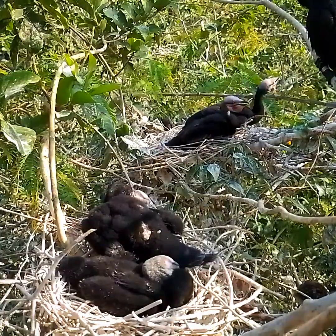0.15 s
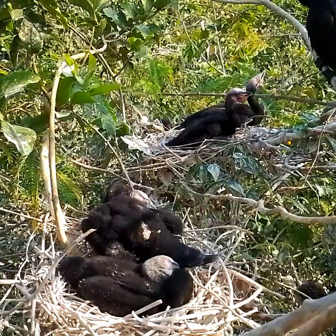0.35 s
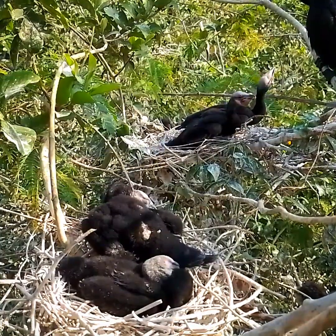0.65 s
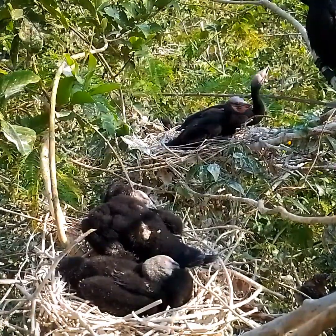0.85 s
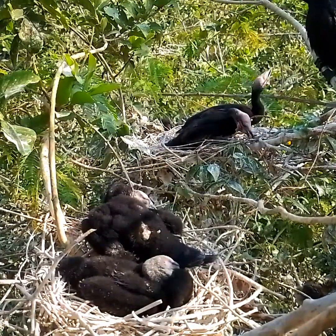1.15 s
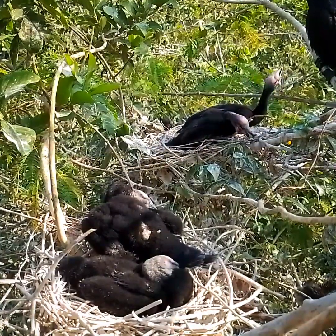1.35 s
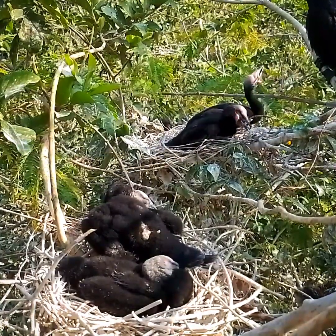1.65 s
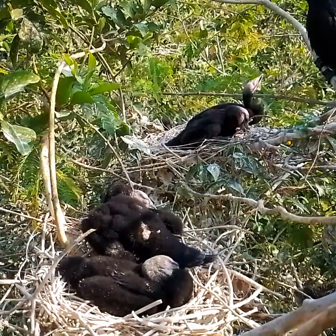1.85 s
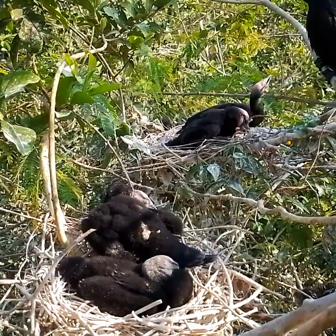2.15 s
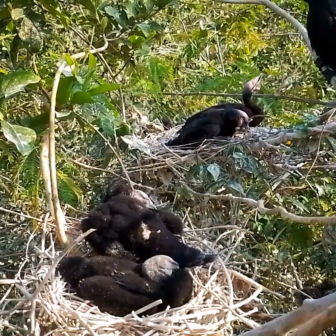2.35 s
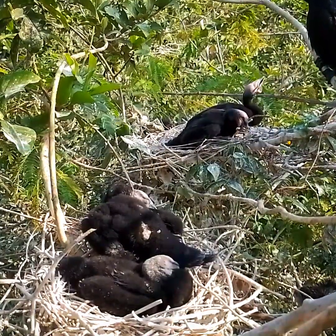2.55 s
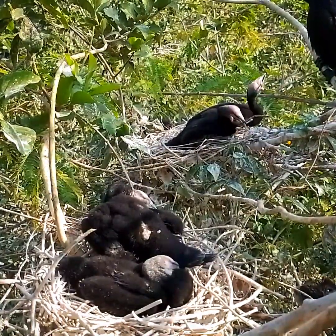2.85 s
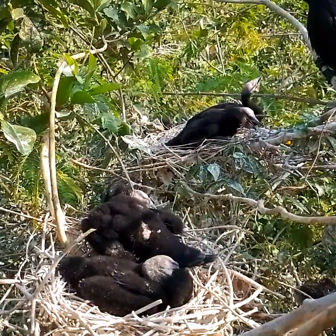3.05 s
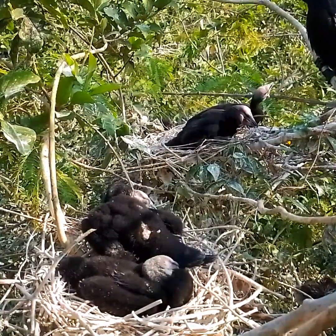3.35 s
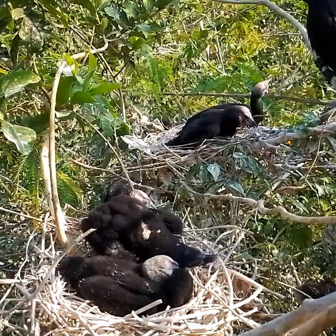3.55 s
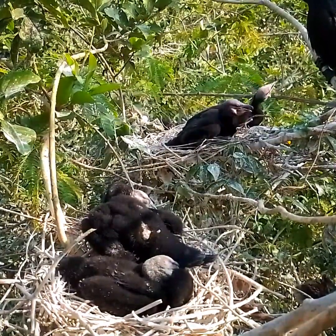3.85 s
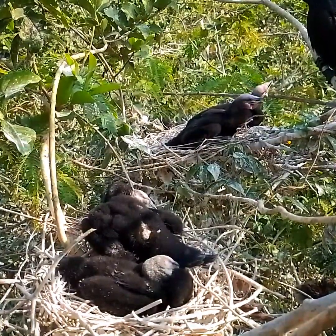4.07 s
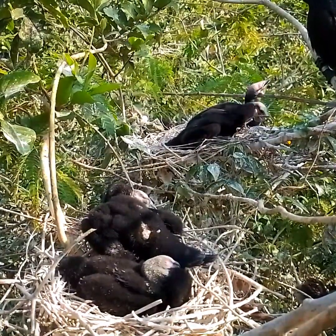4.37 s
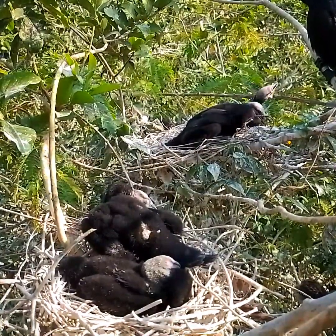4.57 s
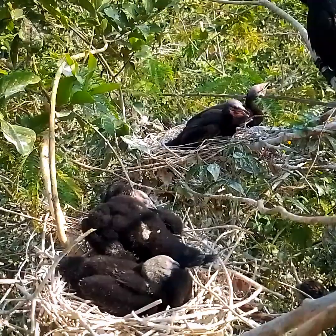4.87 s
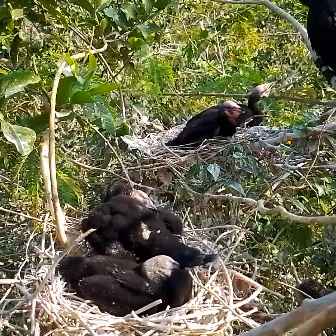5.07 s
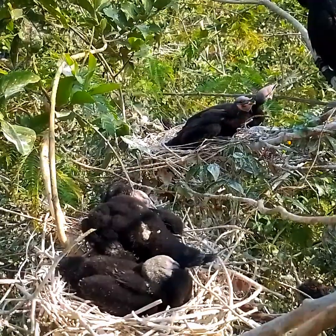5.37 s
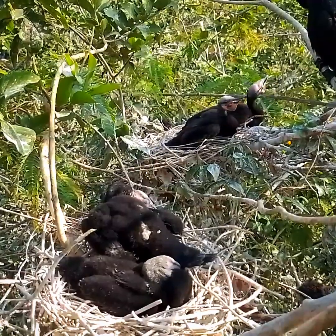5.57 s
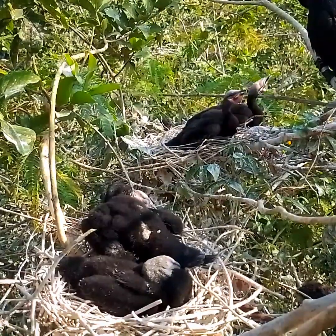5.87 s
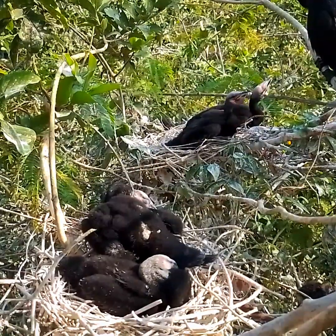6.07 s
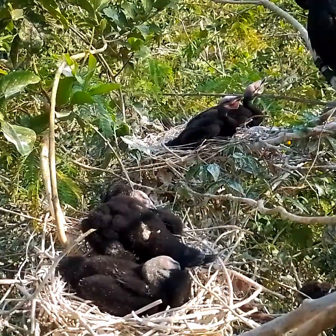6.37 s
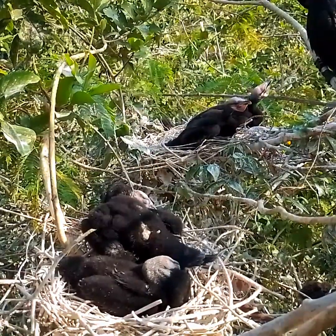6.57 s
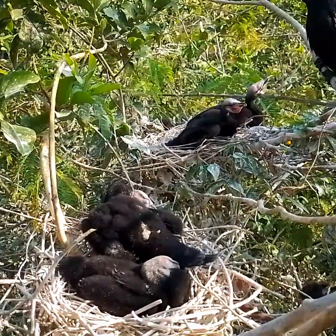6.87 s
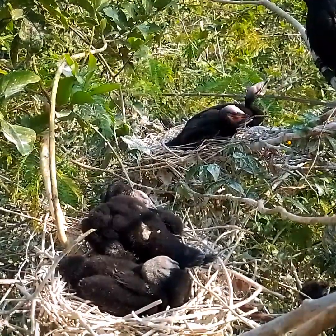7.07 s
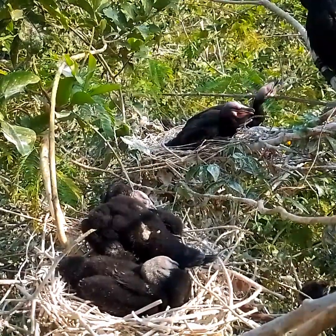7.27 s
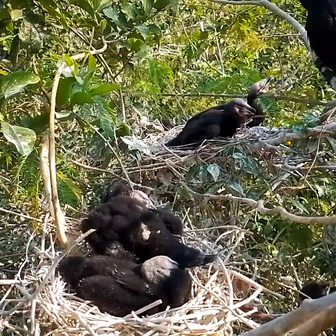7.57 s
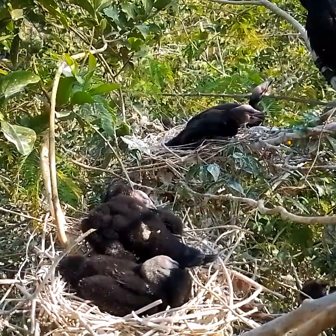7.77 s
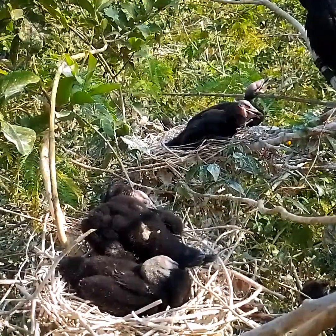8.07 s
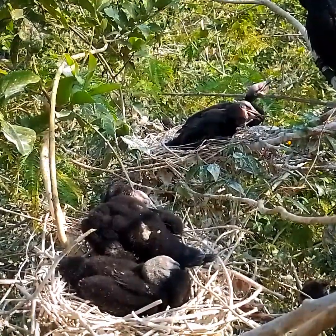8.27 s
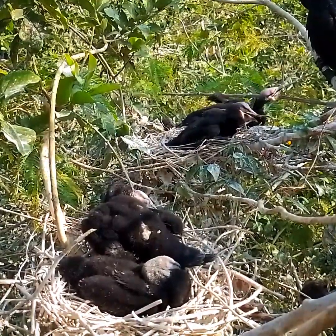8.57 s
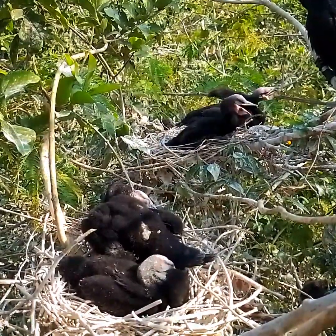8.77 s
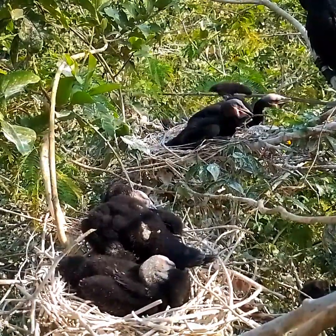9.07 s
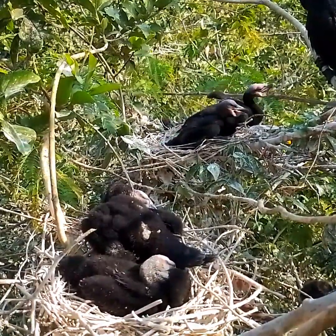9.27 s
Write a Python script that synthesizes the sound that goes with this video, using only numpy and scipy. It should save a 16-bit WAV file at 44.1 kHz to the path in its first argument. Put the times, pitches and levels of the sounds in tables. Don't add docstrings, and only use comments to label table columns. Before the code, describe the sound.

Outdoors in a leafy nesting colony, several dark waterbird chicks beg without pause. Short buzzing chirps repeat about five times a second on the left and are answered by breathier ones on the right, over hoarse chatter. Squeals and rasps grow harsher after six seconds, with soft adult coos almost buried beneath. A nearby stereo microphone catches quick twig and foliage echoes, faint wind and the hiss of distant birds.

```python
import sys
import numpy as np
from scipy import signal
from scipy.fft import rfft, irfft
from scipy.io import wavfile
from scipy.ndimage import uniform_filter1d, map_coordinates

SR = 44100
rng = np.random.default_rng(int(sys.argv[2]) if len(sys.argv) > 2 else 0)


def transcribe(signal):
    frames = np.atleast_2d(signal).T
    limited = np.clip(frames, -1, 1)
    pcm = np.round(limited * 32767).astype(np.int16)
    wavfile.write(sys.argv[1], SR, pcm)


def how_loud(loudness_db):
    steps = np.asarray(loudness_db, float) / 20
    return 10 ** steps


N = 415422

# hz, gain_db
LEFT_PORT = [(150, -55), (700, -25.5), (1300, -19), (2000, -11), (2800, -5.5), (5000, -0.5), (6200, -5),
             (7500, 12.5), (8100, 2.5), (8800, -23), (10500, -19.5), (14200, -27.5), (15000, -74)]
RIGHT_PORT = [(150, -71), (700, -23.5), (1300, -32), (2000, -12.5), (2800, -8), (5000, -4.5), (6200, -14.5),
              (8500, -9.5), (9600, -12), (10500, 3), (11500, -12.5), (14200, -24), (15000, -78)]
PORT_DELAY_S = 14.5 / 44100

# hz, level_db_per_hz
AIR_COLOUR = [(15, -22), (25, -5), (94, -5.5), (156, -18), (230, -5), (496, -2), (630, -1), (1090, -3.5),
              (1580, -2.5), (2000, -4.5), (2600, -14.5), (4400, -120)]
# hz, level_db_per_hz
FAR_COLOUR = [(2000, -30), (3000, -12), (5000, -12.5), (7500, -0.5), (9000, -7), (10500, -6.5),
              (13000, -14), (14100, -20), (14500, -70)]
# hz, t60_s
CROWN_DECAY = [(500, 0.14), (3000, 0.1), (10000, 0.1)]

# top_s, top_pitch_hz, level_db, rise_s
ADULT_COOS = [
    (5.643, 373, -65, 0.047),
    (6.25, 464, -57, 0.039),
    (6.63, 653, -50, 0.036),
    (7.081, 606, -53, 0.055),
    (7.71, 536, -63, 0.034),
    (8.111, 614, -55.5, 0.035),
    (8.474, 638, -54, 0.049),
    (9.117, 436, -60, 0.047),
]
# start_s, length_s, from_hz, to_hz, level_db
CLEAN_PIPS = [
    (2.285, .04, 1500, 1480, -44),
    (2.3, .045, 1150, 1120, -42),
    (7.89, .036, 3500, 1750, -36),
    (7.495, .035, 380, 200, -65),
    (2.575, .035, 340, 320, -67),
    (2.29, .07, 420, 380, -65),
    (6.72, .065, 450, 740, -58),
    (7.89, .028, 7200, 5200, -44),
    (2.285, .06, 1320, 1290, -49),
    (0, .02, 650, 720, -57),
]

# start_s, length_s, from_hz, to_hz, level_db
MELLOW_SQUEALS = [(2.319, 0.087, 2970, 2460, -36.5), (4.371, 0.13, 2960, 2795, -37.5),
                  (4.899, .17, 2636, 2440, -43), (5.091, 0.37, 3090, 3190, -53),
                  (6.101, 0.4, 1693, 1740, -53), (6.762, 0.44, 1347, 1351, -48),
                  (8.35, 0.038, 3900, 3890, -46), (8.43, .15, 2910, 2970, -54.5),
                  (8.6, 0.1, 2940, 2750, -50.5), (8.72, 0.11, 2656, 2510, -50),
                  (8.86, .14, 2460, 2296, -49), (9, .04, 2400, 3600, -50.5)]
SHRILL_SQUEALS = [(6.1, .2, 3000, 2950, -51), (6.16, .07, 3800, 3800, -59.5), (7.2, .06, 2300, 2700, -55.5),
                  (7.26, .08, 3600, 2900, -56.5), (6.64, .16, 2950, 3500, -52),
                  (4.33, 0.18, 3050, 2900, -53), (4.9, .15, 3050, 2950, -59.5),
                  (7.74, 0.1, 2550, 2600, -56), (7.8, 0.12, 3550, 3150, -53.5),
                  (8.78, 0.17, 2520, 2200, -58.5), (9.27, 0.15, 2600, 2420, -51.5),
                  (2.46, 0.048, 2950, 2950, -61)]
# start_s, length_s, from_hz, to_hz, level_db
THIN_WHISTLES = [(0.846, .1, 10900, 11000, -49), (1.456, .2, 10840, 10550, -49.5),
                 (1.731, 0.2, 10500, 10860, -48.5), (2.878, .27, 10600, 10700, -50.5),
                 (4.9, .17, 11000, 10800, -50), (4.96, 0.13, 10230, 10000, -52),
                 (6.59, 0.102, 10600, 10370, -48), (7.13, 0.23, 10400, 10100, -49.5),
                 (7.727, .17, 10970, 10440, -44.5), (7.814, 0.1, 10200, 9740, -36),
                 (8.299, .1, 10400, 10700, -46), (8.82, .12, 10600, 10300, -49)]

# top_s, level_db,
# swell_s, fade_s, throat_hz
CHATTER = [(0.039, -31, 0.068, 0.084, 3260), (.241, -37.5, 0.05, 0.31, 2760),
           (.47, -32.5, 0.066, 0.045, 2860), (0.873, -35.5, 0.14, 0.11, 4200),
           (1.07, -35, 0.024, 0.2, 4130), (1.23, -39.5, 0.011, 1, 3320),
           (1.73, -36, 0.0099, 0.21, 4700), (2.408, -30.5, 0.28, 0.047, 2920),
           (2.92, -39.5, 0.3, 0.51, 3130), (2.66, -40, 0.22, 0.06, 3900),
           (2.73, -39, 0.021, 0.027, 3900), (2.79, -39, 0.024, 0.046, 3150),
           (3.6, -42, 0.37, 0.54, 2950), (3.831, -33.5, 0.11, 0.025, 3050),
           (4.1, -42, 0.38, 0.36, 3000), (4.86, -39, 0.13, 0.07, 2850), (5.3, -45, 1, 0.8, 3200),
           (5.55, -40.5, 0.027, 0.46, 3010)]
HELD_RASPS = [(4.39, -36.5, 0.18, 0.19, 3060), (4.98, -34.5, 0.084, 0.15, 2790),
              (6.12, -39, 0.029, 0.049, 2960), (6.2, -39, 0.079, 0.13, 2900),
              (6.38, -44.5, 0.04, 0.057, 3530), (6.56, -53, 0.051, .06, 2900),
              (6.68, -29, 0.15, 0.067, 2830), (6.79, -30.5, 0.13, 0.072, 3030),
              (7.01, -41, 0.074, 0.066, 3160), (7.16, -29.5, 0.062, 0.17, 2800),
              (7.29, -31, 0.088, 0.086, 3070), (7.6, -41, 0.63, 0.33, 3280),
              (7.85, -27.5, 0.15, 0.081, 3150), (8.08, -43, 0.35, 0.14, 3020),
              (8.33, -32.5, 0.19, 0.18, 3310), (8.7, -41.5, 0.16, 0.12, 2620),
              (8.87, -35, 0.28, 0.13, 2420), (9.15, -38, 0.1, 0.15, 2970), (9.4, -33.5, 0.11, 0.091, 2540)]
# time_s, opening_db, hiss_db
FLOCK_BEAKS = [(0, 3.5, 4), (1, 4, -2), (2, 0.5, 1), (2.45, 1.5, 2), (2.75, 1, 6), (3, -1.5, 10),
               (3.4, 4.5, -4), (3.82, 1.5, -7), (4.2, 4, -2), (4.6, 3, -2), (5, 6.5, 4), (5.6, -0.5, 10),
               (6.25, 4.5, 6.5), (7, 3.5, 9.5), (7.85, 5.5, 11), (8.35, 11.5, 1), (8.7, 9, 2), (9.42, 2, 7)]

# pitch_hz, throat_hz
LEFT_NESTLINGS = [
    (688.5, 3008),
    (602, 3090),
    (838, 3004),
    (924, 4400),
    (653, 4260),
]
RIGHT_NESTLINGS = [
    (958, 3040),
    (920, 4190),
    (694.5, 2970),
    (706, 4620),
]
# start_s, length_s, level_db, beak_opening_db
LEFT_BIRD_1 = [(0, 0.012, -29, 5), (0.19, 0.02, -27.5, 2), (0.388, 0.032, -25.5, 4),
               (0.599, 0.028, -27, 0.5), (0.802, 0.021, -24.5, 6), (1.004, 0.028, -26, 2.5),
               (1.216, 0.029, -25.5, 4.5), (2.07, 0.028, -21.5, 3.5), (2.767, 0.016, -42.5, 11),
               (3.558, 0.023, -28, 9), (3.768, 0.025, -28, 6), (3.992, 0.025, -29.5, 4.5),
               (4.23, 0.022, -25.5, 8), (5.064, .015, -38, 15), (6.344, 0.06, -45, 11.5),
               (6.489, 0.018, -48.5, 10), (7.943, 0.021, -42.5, -10), (8.827, 0.012, -33.5, 19),
               (9.227, 0.017, -35.5, -1), (9.272, 0.018, -46, 13), (9.35, 0.019, -32.5, 13.5)]
LEFT_BIRD_2 = [(.504, 0.02, -36, 9.8), (.57, 0.029, -43.5, 1), (.745, 0.04, -40, 4),
               (0.847, 0.019, -35.5, 21), (1.845, 0.023, -35, 11), (1.866, 0.044, -26.5, 6),
               (2.9, 0.014, -39, 9.7), (3.33, 0.023, -33.5, 5.6), (3.528, 0.0071, -38.5, 27),
               (3.718, .019, -34.5, 14.5), (4.328, 0.041, -32.5, 14.5), (5.705, 0.02, -38, 1),
               (5.861, 0.04, -42, 6), (6.98, 0.054, -40, 5.7), (7.998, 0.034, -31.5, 10.8),
               (8.195, 0.027, -33, 19)]
LEFT_BIRD_3 = [
    (.931, 0.029, -40, -0.5),
    (2.59, 0.014, -45, 6),
    (3.035, 0.024, -34, 7.5),
    (4.131, 0.027, -34, 6.5),
    (4.302, 0.025, -31, 15.5),
    (4.519, 0.03, -33, 12.5),
    (5.8, 0.025, -34, 29),
    (8.416, 0.029, -33, 22),
    (8.982, 0.051, -38.5, 11.5),
]
LEFT_BIRD_4 = [
    (.021, .022, -25.5, 30),
    (1.423, 0.057, -41.5, 2.5),
    (1.577, 0.04, -36.5, 7.4),
    (1.975, 0.018, -29.5, 18),
    (3.213, 0.027, -41.5, 8.8),
    (3.595, 0.026, -34, 8.4),
    (5.553, 0.014, -29, 22),
]
LEFT_BIRD_5 = [
    (1.645, 0.043, -36.5, 14),
    (2.027, 0.035, -34.5, 10.5),
    (2.211, 0.037, -30.5, 11.5),
    (2.269, 0.029, -22.5, 0),
    (9.156, 0.037, -37.5, 10),
]
RIGHT_BIRD_1 = [(.241, 0.025, -28, 17.3), (0.658, 0.051, -30.5, 17.7), (1.314, 0.013, -30, 17),
                (1.529, 0.039, -34, 26), (2.397, 0.0085, -26, 19), (2.952, 0.036, -40, 5.7),
                (3.118, 0.04, -35, 10.4), (4.091, 0.036, -32.5, 21), (5.115, 0.026, -27, 17.5),
                (7.383, 0.028, -30, 17), (8.68, .02, -39, 12), (8.698, 0.028, -31, 19)]
RIGHT_BIRD_2 = [(0.454, 0.019, -27, 26), (1.716, 0.039, -39, 19), (1.76, 0.02, -31, 29),
                (2.183, 0.021, -29.5, 22), (2.616, 0.013, -32, 17.6), (3.253, 0.081, -37.5, 14),
                (3.476, 0.0096, -30, 19.5), (3.682, 0.021, -34.5, 22), (3.888, 0.019, -36.5, 26),
                (4.682, 0.019, -35, 20), (4.889, 0.05, -32, 27), (8.164, 0.013, -39, 15),
                (8.337, 0.064, -36, 75)]
RIGHT_BIRD_3 = [(1.095, 0.023, -32.5, 15.5), (3.069, 0.022, -34, 13), (4.026, 0.034, -34, 10.5),
                (4.627, 0.03, -42.5, 7), (4.724, .022, -37, 14), (5.342, 0.05, -31.5, 16),
                (6.027, 0.02, -41.5, 15.5), (5.275, 0.0097, -46.5, 6), (5.447, 0.007, -47, 16),
                (5.676, 0.015, -29, 22), (6.513, 0.019, -36, 15.5), (6.857, 0.027, -33.5, 13),
                (6.931, 0.02, -39.5, -4.5), (7.502, 0.022, -34.5, 6.5), (7.615, 0.035, -36.5, 10),
                (8.099, 0.039, -39, 10), (8.594, 0.06, -37.5, 12), (9.126, 0.021, -36.5, 15)]
RIGHT_BIRD_4 = [
    (3.394, 0.058, -35.5, 7.9),
    (6.543, 0.018, -36.5, 8.7),
    (8.875, 0.05, -37, 360),
]


def unit(x):
    return x / np.sqrt(np.mean(np.abs(x) ** 2) + 1e-20)


def along(points, hz):
    f, v = np.transpose(points)
    return np.interp(np.log(hz + 1), np.log(f + 1), v)


def ports(hz, side, shade_db):
    cepstrum = irfft(np.log(how_loud([along(LEFT_PORT, hz), along(RIGHT_PORT, hz)])))
    cepstrum[:, 1:len(hz) - 1] *= 2
    cepstrum[:, len(hz):] = 0
    way = np.array([[side], [-side]]) / 2
    delay = 2j * np.pi * hz * PORT_DELAY_S * (1 + way)
    return np.exp(rfft(cepstrum) - delay) * how_loud(-way * shade_db)


def air():
    z = signal.stft(rng.standard_normal((2, N)), nperseg=1024)[2]
    patches = uniform_filter1d(rng.standard_normal(z.shape[1:]), size=4, axis=0)
    patches = uniform_filter1d(patches, size=6, axis=1)
    patch_db = 3.5 * unit(patches) * (np.arange(513) > 6)[:, None]
    common, own = rfft(signal.istft(z * how_loud(patch_db), nperseg=1024)[1][:, :N])
    hz = np.fft.rfftfreq(N, 1 / SR)
    apart = np.where(hz < 125, .8, .42)
    pair = np.array([common + apart * own, common - apart * own])
    return unit(irfft(pair * how_loud(along(AIR_COLOUR, hz)), N))


def far_colony(din_db):
    colour = how_loud(along(FAR_COLOUR, np.fft.rfftfreq(N, 1 / SR)))
    hiss = unit(irfft(rfft(rng.standard_normal((2, N))) * colour, N))
    return hiss * how_loud(-62 + .4 * (din_db + 40))


def foliage(x):
    out, hop = np.zeros((2, N + SR)), SR // 4
    fade = np.hanning(2 * hop)
    for i in range(-hop, N, hop):
        start = max(i, 0)
        hz, t, z = signal.stft(rng.standard_normal((2, SR // 3)), SR, nperseg=256)
        decay_db = -60 * t / along(CROWN_DECAY, hz)[:, None]
        tail = signal.istft(z * how_loud(decay_db), SR, nperseg=256)[1]
        piece = x[:, start:i + 2 * hop]
        piece = piece * fade[max(-i, 0):][:piece.shape[1]]
        wet = signal.fftconvolve(piece, tail / np.linalg.norm(tail[0]), axes=1)
        out[:, start + 90:][:, :wet.shape[1]] += wet
    return out[:, :N]


def twigs(hz, echo):
    delay_s, size = rng.uniform(0.00015, .004, (4, 2, 1)), rng.normal(0, echo, (4, 2, 1))
    return 1 + np.sum(size * np.exp(-2j * np.pi * hz * delay_s), axis=0)


def coos():
    out = np.zeros(N)
    for top_s, top_hz, db, rise_s in ADULT_COOS:
        u = np.r_[np.linspace(-1, 0, int(rise_s * SR)), np.linspace(0, 1, int(.038 * SR))]
        phase = 2 * np.pi * np.cumsum(top_hz * (1 - 0.5 * np.abs(u) ** 1.2)) / SR
        overtones = sum(np.sin(k * phase) * rng.uniform(.4, 1.1) for k in range(2, 6))
        tone = np.sin(phase) + how_loud(-3) * overtones
        flutter_db = 2 * unit(uniform_filter1d(rng.standard_normal(len(u)), size=400))
        out[int((top_s - rise_s) * SR):][:len(u)] += how_loud(db + 2 + flutter_db) * (1 - u ** 2) * tone
    return signal.sosfilt(signal.butter(4, 260, 'high', fs=SR, output='sos'), out)


def pips():
    out = np.zeros(N)
    for s, length, from_hz, to_hz, db in CLEAN_PIPS:
        n = int(length * SR)
        waver = unit(uniform_filter1d(rng.standard_normal(n), size=150))
        pitch_hz = np.linspace(from_hz, to_hz, n) * (1 + .025 * waver)
        tone = np.sin(2 * np.pi * np.cumsum(pitch_hz) / SR)
        out[int(s * SR):][:n] += how_loud(db + 5) * np.hanning(n) ** .6 * tone
    return out


def squeals():
    out, m = np.zeros((2, N + 32768)), 32768
    hz = np.fft.rfftfreq(m, 1 / SR)
    heard = ports(hz, 0.99, 5.0)
    table = [(*row, -10.5) for row in MELLOW_SQUEALS + THIN_WHISTLES]
    table += [(*row, 14) for row in SHRILL_SQUEALS]
    for s, length, from_hz, to_hz, db, second_db in table:
        u = np.linspace(0, 1, int(length * 1.1 * SR))
        waver, throb, swell = (unit(uniform_filter1d(rng.standard_normal(len(u)), size=k))
                               for k in (90, 60, 1200))
        pitch_hz = from_hz + (to_hz - from_hz) * u ** 2 + (55 + .009 * from_hz) * waver
        phase = 2 * np.pi * np.cumsum(pitch_hz) / SR
        tone = np.sin(phase) + how_loud(second_db) * np.sin(2 * phase)
        tone += how_loud(second_db - 15) * np.sin(3 * phase)
        tone *= (1 + 0.48 * throb) * how_loud(db + 2.95 * swell)
        tone *= np.minimum(4 * u, 1) * (1 - u ** 8)
        call = irfft(rfft(tone, m) * heard * how_loud(9) * twigs(hz, echo=.15))
        out[:, int((s - .05 * length) * SR):][:, :m] += call
    return out[:, :N]


def bump(hz, centre_hz, width_hz, db):
    return how_loud(db) * 1j * hz * width_hz / (centre_hz ** 2 - hz ** 2 + 1j * hz * width_hz)


def beak(hz, open_db):
    return how_loud(open_db / (1 + (5200 / (hz + 1)) ** 8))


def top_shelf(hz, db):
    return how_loud(db / (1 + (11800 / (hz + 1)) ** 12))


def buzz(pitch_hz, jitter, scatter_db, noisy):
    n = len(pitch_hz)
    luck = rng.standard_normal((3, n))
    waver = unit(uniform_filter1d(luck[0], size=60))
    cycle = np.cumsum(pitch_hz * (1 + jitter * waver)) / SR
    turn = cycle.astype(int)
    size = how_loud(scatter_db * luck[1][turn % n] + 2 * (turn % 2))
    pulses = np.diff(turn, prepend=0) * size
    breath = luck[2] * size * np.exp(-2 * (cycle - turn))
    return np.sqrt(1 - noisy) * unit(pulses) + np.sqrt(noisy) * unit(breath)


def bouts(s):
    top_s, db, swell_s, fade_s, throat_hz = np.transpose(CHATTER + HELD_RASPS)[:, :, None]
    law = np.r_[np.ones(len(CHATTER)), np.full(len(HELD_RASPS), 1.8)][:, None]
    away = np.where(s < top_s, (top_s - s) / swell_s, (s - top_s) / fade_s)
    power = how_loud(2 * (db - 15 * away ** law)) + 1e-12
    throat_hz = np.sum(power * throat_hz, axis=0) / power.sum(axis=0)
    open_db = np.interp(s, *np.transpose(FLOCK_BEAKS)[:2]) - 2 * (throat_hz / 1000 - 3)
    return 10 * np.log10(power.sum(axis=0)), throat_hz, open_db


def rasps():
    s = np.arange(0, N, 128) / SR
    db, throat_hz, open_db = bouts(s)
    steps = np.tile(np.arange(N) * 11 / SR, (3, 1))
    drift = map_coordinates(rng.standard_normal((3, 120)), [np.arange(3)[:, None] + np.zeros(N), steps], order=1)
    low, mid, high = [buzz(rate_hz * (1 + .07 * d), .07, 2.2, .6)
                      for rate_hz, d in zip((260, 700, 860), drift)]
    pair = [low + 1.8 * mid + .35 * high, low + .3 * mid + 1.8 * high]
    hz, t, z = signal.stft(pair, SR, nperseg=1024)
    f = hz[:, None]
    throat = np.interp(t, s, throat_hz)
    tract = 1 + bump(f, throat, 450, 6) + bump(f, 1.95 * throat, 500, 5)
    tract = tract + bump(f, 720, 300, 1) + bump(f, 1400, 600, 0)
    tract = tract * (1 - .8 * np.exp(-((f - 1.45 * throat) / 400) ** 2))
    patches = uniform_filter1d(rng.standard_normal(z.shape), size=5, axis=1)
    patches = uniform_filter1d(patches, size=6, axis=2)
    hiss_db = np.interp(t, *np.transpose(FLOCK_BEAKS)[::2])
    mouth = beak(f, np.interp(t, s, open_db) - 3) * top_shelf(f, hiss_db)
    gain = ports(hz, 1, 3)[:, :, None] * tract * mouth * how_loud(6.5 * unit(patches))
    gain /= np.sqrt(np.mean(np.abs(gain) ** 2, axis=(0, 1)))
    hoarse = unit(signal.istft(z * gain, SR, nperseg=1024)[1][:, :N])
    return hoarse * how_loud(np.interp(np.arange(N) / SR, s, db))


def nest(voices, *tables):
    return [(s, length, db, pitch_hz * (1 + .025 * rng.normal()), throat_hz * (1 + .02 * rng.normal()), open_db)
            for (pitch_hz, throat_hz), table in zip(voices, tables)
            for s, length, db, open_db in table]


def chirps(table, side, shade_db, noisy, base_db, attack_s, lead_s, fall):
    out, m = np.zeros((2, N + 8192)), 8192
    hz = np.fft.rfftfreq(m, 1 / SR)
    heard = ports(hz, side, shade_db)
    for s, length, db, pitch_hz, throat_hz, open_db in table:
        t = np.arange(int(max(length, .008) * 1.1 * SR)) / SR
        u = t / t[-1]
        shape = (1 - np.exp(-t / attack_s)) * (1 - u ** fall)
        glide_hz = pitch_hz * (1.08 - .3 * (1 - u) ** 2)
        hum = how_loud(base_db) * np.sin(2 * np.pi * np.cumsum(glide_hz) / SR)
        voice = shape * (buzz(glide_hz, .04, 1.5, noisy) + hum)
        pipe_hz = throat_hz / (1 + (throat_hz > 3750))
        tract = 1 + sum(bump(hz, k * pipe_hz, 400, 11 if k * pipe_hz > 2400 else 4.5) for k in range(1, 5))
        mouth = beak(hz, open_db - 10) * top_shelf(hz, -4.5)
        call = irfft(rfft(voice, m) * tract * mouth * heard * twigs(hz, echo=.3))
        call *= how_loud(db) / np.sqrt(np.mean(call[:, :len(t)] ** 2))
        out[:, max(round((s - lead_s) * SR), 0):][:, :m] += call
    return out[:, :N]


def scene():
    nearest = nest(LEFT_NESTLINGS[:1], LEFT_BIRD_1)
    left = nest(LEFT_NESTLINGS[1:], LEFT_BIRD_2, LEFT_BIRD_3, LEFT_BIRD_4, LEFT_BIRD_5)
    right = nest(RIGHT_NESTLINGS, RIGHT_BIRD_1, RIGHT_BIRD_2, RIGHT_BIRD_3, RIGHT_BIRD_4)
    calls = chirps(left, -1.03, 6.0, noisy=.36, base_db=-7, attack_s=0.0038, lead_s=0.0016, fall=2.8)
    calls += chirps(nearest, -0.983, 8.2, noisy=.36, base_db=-7, attack_s=0.002, lead_s=0.001, fall=4.7)
    calls += chirps(right, 0.78, 0.61, noisy=.48, base_db=-1.5, attack_s=0.0086, lead_s=0.0042, fall=1.42)
    tones = coos() + pips()
    tones = np.array([tones, np.roll(tones, -round(PORT_DELAY_S * SR))])
    voices = calls + squeals() + tones
    s = np.arange(0, N, 128) / SR
    din_db = np.interp(np.arange(N) / SR, s, bouts(s)[0])
    bed = how_loud(-68.0 + 0.16 * (din_db + 33.5)) * air()
    return voices + how_loud(-5.0) * foliage(voices) + rasps() + bed + far_colony(din_db)


def open_gaps(x):
    hz, _, z = signal.stft([x[0] + x[1], x[0] - x[1]], SR, nperseg=2048)
    power = uniform_filter1d(np.abs(z) ** 2, size=2, axis=2) + 1e-20
    near, wide = (uniform_filter1d(power, size=k, axis=1) for k in (9, 170))
    depth = np.abs(near / wide)
    depth *= how_loud(9 * unit(uniform_filter1d(rng.standard_normal(z.shape), size=9, axis=1)))
    # (Hz, factor)
    spared = [(1200, 3), (1550, 1), (2200, 1), (2500, 2), (8000, 2), (8700, 8), (9400, 2.5), (11500, 2),
              (12500, .6)]
    depth *= along(spared, hz)[:, None]
    depth[:, (hz < 900) | (hz > 14300)] = 99
    deepest = depth < np.quantile(depth, .066 / 2)
    gone = uniform_filter1d(1. * deepest, size=5, axis=1) > 0
    mid, side = signal.istft(z * np.where(gone, .03, 1), SR, nperseg=2048)[1][:, :N]
    return np.array([mid + side, mid - side]) / 2


def low_pass(x):
    return signal.sosfilt(signal.butter(12, 15140, fs=SR, output="sos"), x)


def record(dry):
    mix = open_gaps(dry)
    return low_pass(mix)


dry = scene()
out = record(dry)
transcribe(out)
```